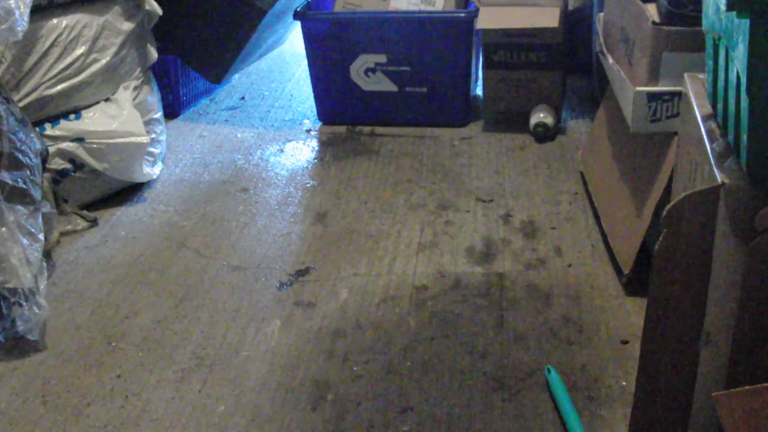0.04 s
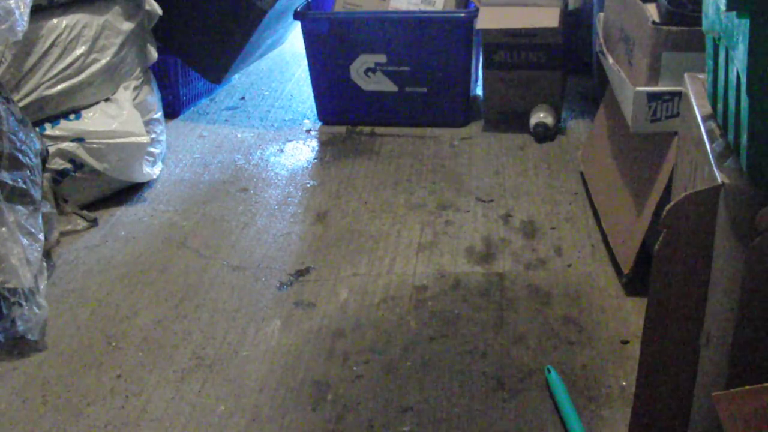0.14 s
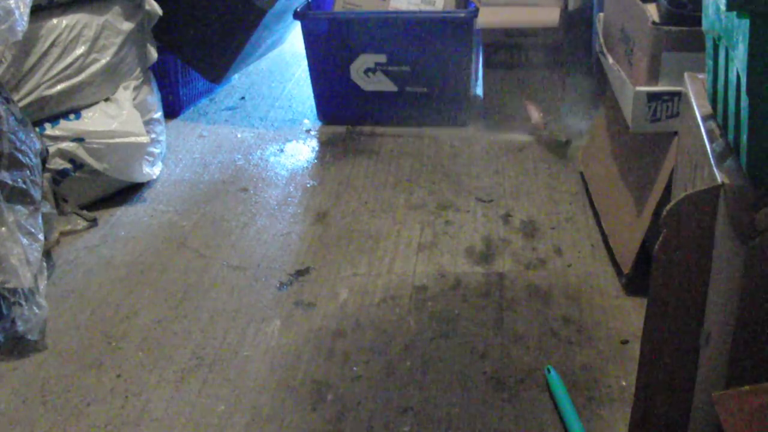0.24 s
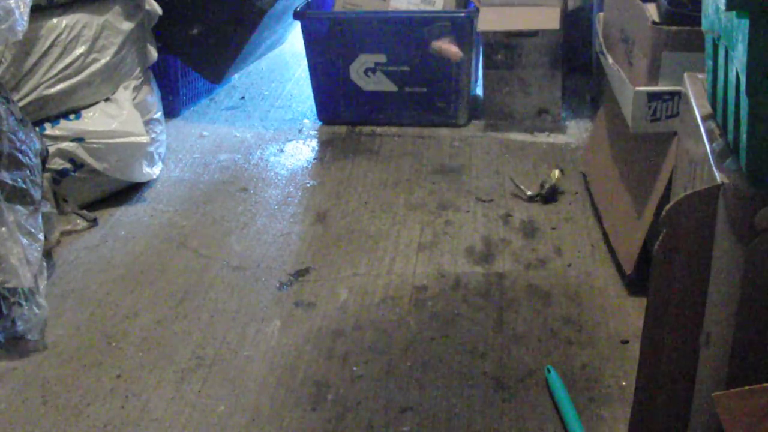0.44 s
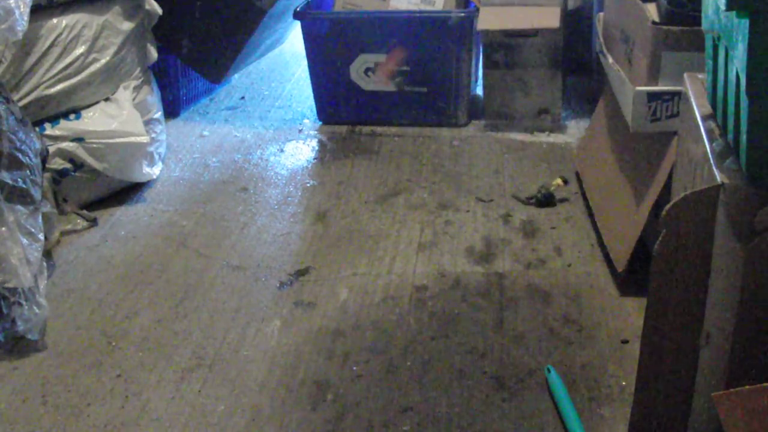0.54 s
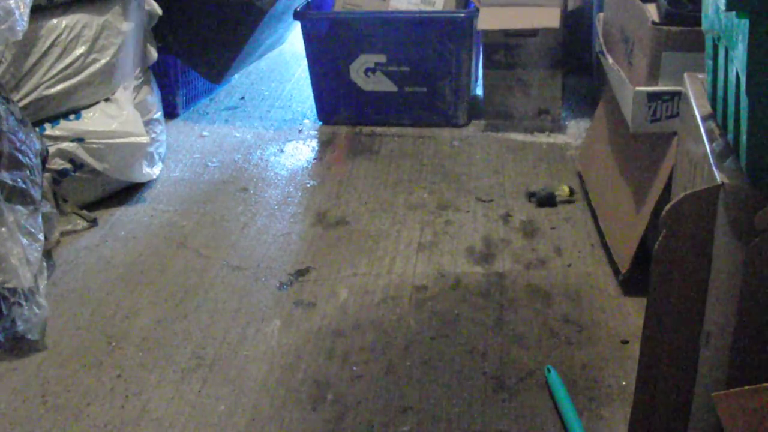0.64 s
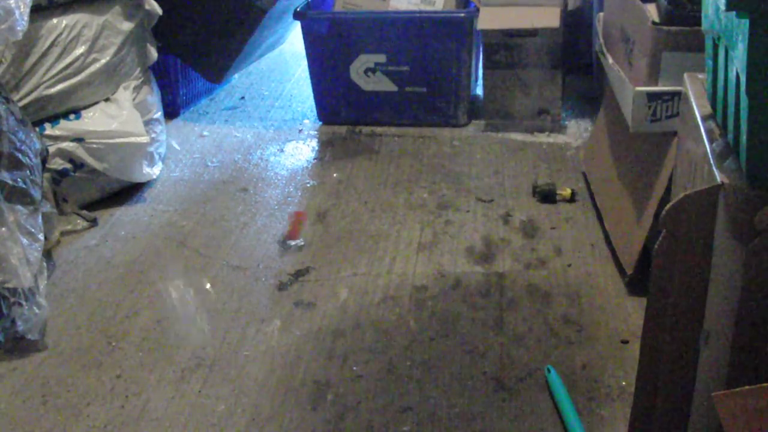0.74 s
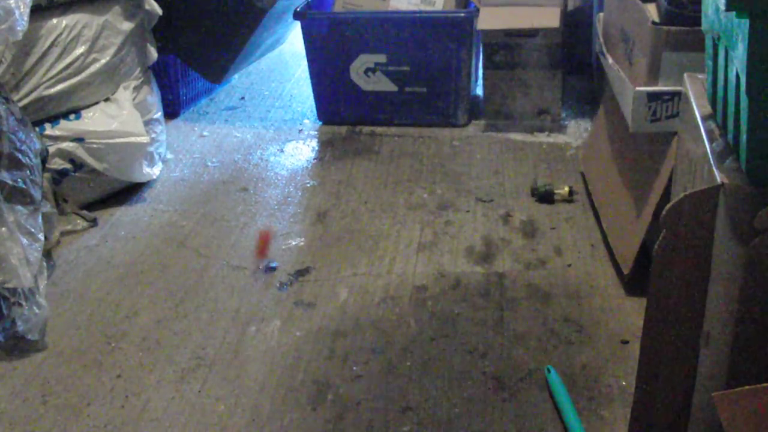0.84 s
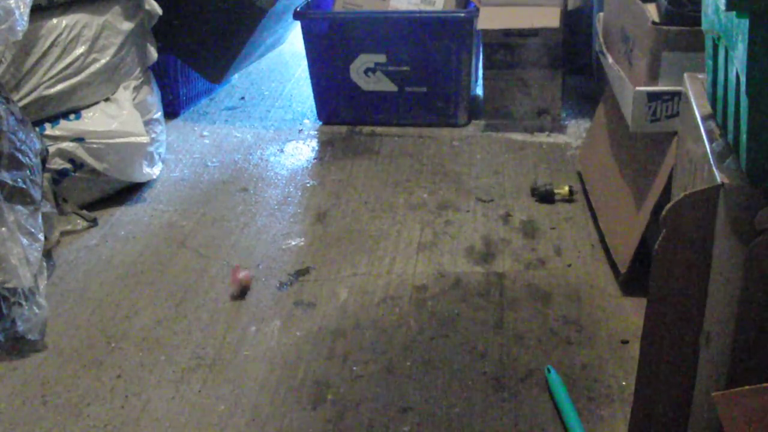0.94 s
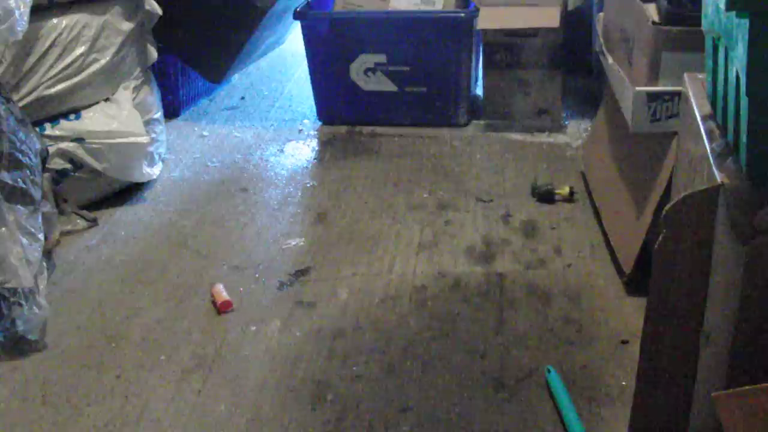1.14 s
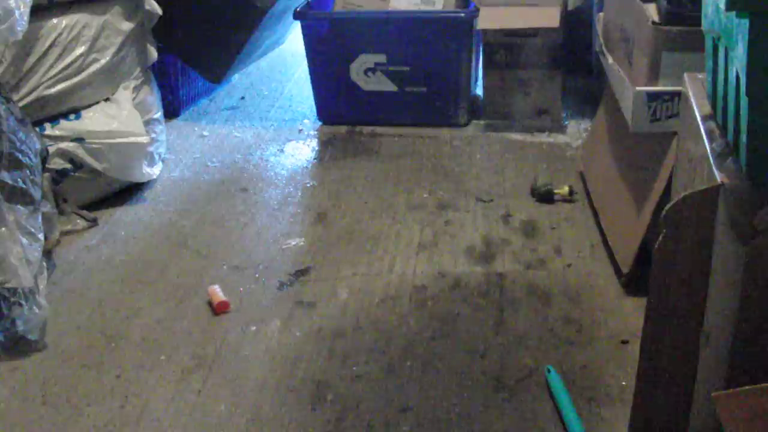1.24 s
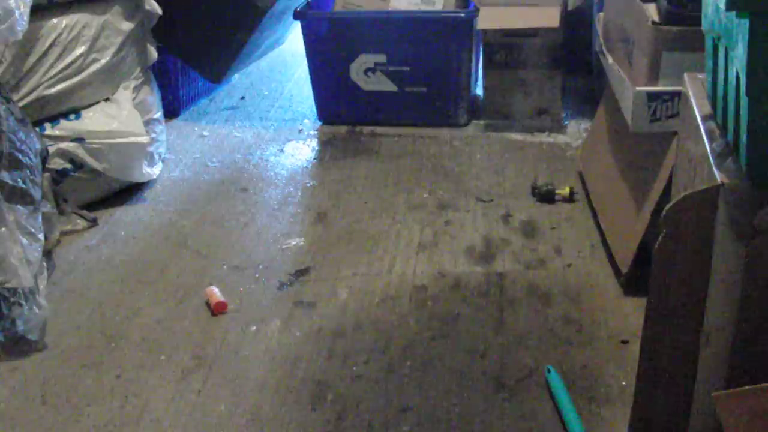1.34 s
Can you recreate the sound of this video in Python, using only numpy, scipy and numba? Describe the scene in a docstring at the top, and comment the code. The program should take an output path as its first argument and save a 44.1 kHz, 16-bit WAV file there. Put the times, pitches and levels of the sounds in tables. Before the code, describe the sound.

A toy grenade bangs loudly, then small pieces click and bounce on a concrete floor.

```python
"""Toy grenade in a storage room.

It bursts on the concrete floor, close enough to overload the microphone for a tenth of a second.
The room rings out and something metal hums on. Grit patters down, hard bits tick and whine as they
spin, the heavy body settles with dull bumps and a hollow plastic piece bounces."""
import sys
import numpy as np
from scipy import signal
from scipy.fft import rfft, irfft, next_fast_len
from scipy.io import wavfile
from numba import njit

SR = 44100
rng = np.random.default_rng(int(sys.argv[2]) if len(sys.argv) > 2 else 0)


def output_pcm(signal):
    """Save a mono or channel-first signal as 16-bit PCM at the path in sys.argv[1].

    Samples are clipped to [-1, 1] before scaling.
    """
    pcm = np.clip(np.atleast_2d(signal).T, -1, 1) * 32767
    wavfile.write(sys.argv[1], SR, np.round(pcm).astype(np.int16))


N = 61739
BURST_S = 0.2218


def undb(db):
    """Decibels to gain."""
    return 10 ** (np.asarray(db) / 20)


def unit(x):
    """Scale to rms 1."""
    return x / np.sqrt(np.mean(x ** 2))


def clock():
    """Time of every sample, in seconds."""
    return np.arange(N) / SR


def along(points, hz):
    """Read a (frequency, value) table on a log-frequency axis."""
    f, v = np.array(points, float).T
    return np.interp(np.log(hz + 1e-9), np.log(f), v)


def shape(x, gain):
    """Filter by a gain given as a function of frequency."""
    size = next_fast_len(N + N // 8)
    hz = np.maximum(np.arange(size // 2 + 1) * SR / size, 1)
    return irfft(rfft(x, size) * gain(hz), size)[:N]


def noise(spectrum):
    """Noise of rms 1, coloured by a table of relative levels."""
    return unit(shape(rng.standard_normal(N), lambda f: undb(along(spectrum, f))))


def drift(rate_hz):
    """Smooth random drift of rms 1."""
    return unit(shape(rng.standard_normal(N), lambda f: np.exp(-(f / rate_hz) ** 2)))


def fade(t60):
    """Exponential decay, 60 dB down after t60 seconds."""
    return np.exp(-np.log(1000) * clock() / t60)


def at(x, start):
    """Delay a sound to its start time."""
    return np.concatenate([np.zeros(int(start * SR)), x])[:N]


def ring(modes):
    """Decaying modes after one blow."""
    return sum(undb(db) * fade(t60) * np.sin(2 * np.pi * hz * clock()) for hz, db, t60 in modes)


def high_pass(x, hz, order=2):
    """Roll off what lies below hz."""
    return signal.sosfilt(signal.butter(order, hz, "high", fs=SR, output="sos"), x)


def tilted(x, db_per_octave, pivot_hz):
    """Brighten or dull a sound over two octaves either side of a pivot."""
    return shape(x, lambda f: undb(db_per_octave * np.clip(np.log2(f / pivot_hz), -2, 2)))


def room_tone(rumble_hz=44.7, width_hz=11):
    """The storage room at rest: faint hiss over a low rumble."""
    # spectrum of the hiss (frequency [Hz], relative level [dB])
    hiss_spectrum = [(59, -27), (100, 1.5), (147, -3), (197, 2), (283, -6.5), (801, -10), (1420, -12.5),
                     (1800, -3.5), (2270, -17), (5770, -20), (6560, -15.5), (7610, -16), (8460, -5),
                     (10200, -19), (16000, -18.5)]
    rumble = unit(shape(rng.standard_normal(N), lambda f: 1 / (1 + ((f - rumble_hz) / width_hz) ** 2)))
    return undb(-57) * noise(hiss_spectrum) + undb(-52) * rumble


def grit(grains_per_s=840, spread_db=2.5, fade_db_per_s=5):
    """Fine debris patters and rolls after the burst; the room blurs it into a slowly fading hiss."""
    # grit on concrete (frequency [Hz], relative level [dB])
    grit_spectrum = [(200, -1.5), (500, 7.5), (900, 2), (1400, -4), (2500, 0), (4000, -3.5), (6000, -1),
                     (8000, -14), (10000, -5.5), (13000, -7), (16000, -11)]
    landings = rng.random(N) < grains_per_s / SR
    grains = landings * undb(spread_db * np.minimum(rng.exponential(size=N), 2))
    blurred_power = signal.fftconvolve(grains ** 2, fade(t60=0.017))[:N]
    patter = unit(np.sqrt(np.abs(blurred_power)) * noise(grit_spectrum))
    return at(high_pass(patter, hz=140) * undb(-48.5 - fade_db_per_s * clock()), BURST_S)


def spinning_bits(edge_s=0.0093, pitch_jitter=0.0088, flutter_db=2):
    """Spinning bits whine and sink in pitch as they slow; reflections make them waver."""
    # one curve for each bit's whine (time [s], pitch [Hz], level [dB])
    whines = [
        [(.92, 2590, -58), (.966, 2703, -52), (1.01, 2657, -49.5), (1.03, 2680, -52), (1.06, 2665, -51),
         (1.095, 2625, -47), (1.118, 2600, -63), (1.13, 2555, -49.5), (1.2, 2440, -50.5)],
        [(1.335, 1796, -46.5), (1.35, 1668, -56), (1.4, 1560, -54)],
    ]
    t, direct = clock(), np.zeros(N)
    for curve in whines:
        times, hz, db = np.array(curve).T
        pitch = np.interp(t, times, hz) * (1 + pitch_jitter * drift(rate_hz=144))
        phase = 2 * np.pi * np.cumsum(pitch) / SR
        tone = undb(-0.5) * np.sin(phase) + undb(-7.5) * np.sin(2 * phase)
        gate = np.clip(1 + np.minimum(t - times[0], times[-1] - t) / edge_s, 0, 1)
        gain = undb(np.interp(t, times, db) + flutter_db * drift(rate_hz=60))
        direct += np.sqrt(2) * gate * gain * tone
    room = rng.standard_normal(N) * fade(t60=0.15)
    return direct + undb(-8) * signal.fftconvolve(direct, room / np.linalg.norm(room))[:N]


def heavy_body():
    """The grenade body rocks on the floor and settles with dull, quiet bumps."""
    # bumps (time [s], level [dB])
    bumps = [(.705, -44), (.735, -46), (.779, -46)]
    # spectrum of a bump (frequency [Hz], relative level [dB])
    bump_spectrum = [(100, -20), (250, -8), (330, -1), (550, -2.5), (900, -6), (2000, -13.5), (4000, -25)]
    return sum(undb(db) * at(noise(bump_spectrum) * fade(t60=0.38), start) for start, db in bumps)


def hollow_piece(slap_s=0.0013, room_db=-9.5, shell_db=-14.5):
    """The hollow plastic piece slaps the floor and rings briefly in the room."""
    # bounces (time [s], level [dB], low cut [Hz], high cut [Hz])
    bounces = [(1.1975, -25.5, 354, 9000), (1.2036, -38, 1990, 5800), (1.209, -27, 408, 6160),
               (1.222, -41, 403, 4030), (1.2925, -31.5, 1650, 5140), (1.3335, -30, 1500, 3760),
               (1.348, -41.5, 1470, 3070)]
    # plastic slapping concrete (frequency [Hz], relative level [dB])
    slap_spectrum = [(200, -5), (600, -5), (800, 0.5), (1900, -2), (2700, -5), (6400, -16), (11000, -13),
                     (16000, -27)]
    # modes of the shell (frequency [Hz], relative level [dB], t60 [s])
    shell_modes = [(215, -2, 0.13), (440, -4, 0.16), (748, 1, 0.24), (837.5, 5.5, 0.27), (1152, 4.5, 0.093),
                   (1425, -4, 0.1), (1663, 6, 0.049), (1876, 1.5, .1), (2470, 1.5, 0.097),
                   (2440, -2.5, 0.15)]
    out = np.zeros(N)
    envelope = np.exp(-clock() / slap_s) + undb(room_db) * fade(t60=0.33)
    for start, db, low_hz, high_hz in bounces:
        blow = envelope * noise(slap_spectrum) + undb(shell_db) * ring(shell_modes)
        band = signal.butter(2, [low_hz, high_hz], "band", fs=SR, output="sos")
        out += undb(db) * at(signal.sosfilt(band, blow), start)
    return out


def hard_bits(click_s=0.00055, boxes_db=-15, room_db=-19, resonance_octaves=0.19):
    """Each hard bit clicks on the concrete; nearby boxes and then the room answer."""
    # strikes (time [s], level [dB], tilt [dB/octave], low cut [Hz], resonance [Hz], its lift [dB])
    strikes = [(0.599, -27.5, 1.5, 1980, 5940, -5), (0.657, -41, 7.5, 2960, 7000, 7),
               (.7025, -17, 5.5, 1860, 4240, 2.5), (0.7052, -19.5, -0.5, 1880, 4300, 2.5),
               (0.7087, -22.5, 6.5, 1910, 2260, 16), (0.7176, -32, -8, 1980, 3980, 9),
               (.7363, -31, 7.5, 4000, 10800, 6), (.7505, -33, 6.5, 4000, 10000, 5),
               (0.7788, -25.5, -4.5, 1386, 2470, 6), (.782, -25.5, -3.5, 1400, 2400, -4),
               (0.8931, -22, -1.5, 1850, 2090, 6), (0.8941, -27, 5.5, 2200, 4000, 4),
               (0.92, -30.5, 3, 3570, 6970, 5), (0.924, -36.5, 12, 3450, 7000, 3),
               (0.9293, -44, -5, 3500, 11000, 0), (0.93, -25.5, 7, 3500, 7150, -1),
               (.9399, -35, 4, 3500, 13000, 13), (0.9726, -25, 3, 2030, 9900, 4),
               (0.987, -43.5, 4, 1810, 2160, 28), (1, -38, 6, 2030, 10100, -9),
               (1.0323, -34.5, 6, 3000, 9100, 1), (1.0597, -29, 0.5, 1950, 5370, 7.5),
               (1.07, -38, 7, 2500, 5530, 10), (1.0826, -32, 6, 3000, 5800, -6),
               (1.087, -32, 0.5, 2000, 5770, 8)]
    # the click and the room's answer (frequency [Hz], relative level [dB])
    click_spectrum = [(1000, 5.5), (5000, 0), (10000, -5), (16000, -13)]
    room_spectrum = [(1000, 4), (4000, 4), (10000, -6), (16000, -24)]
    out = np.zeros(N)
    envelope = np.exp(-clock() / click_s) + undb(boxes_db) * fade(t60=0.081)
    for start, db, tilt, low_hz, resonance_hz, lift_db in strikes:
        near = envelope * noise(click_spectrum)
        room = undb(room_db) * fade(t60=0.39) * noise(room_spectrum)
        hit = shape(near + room,
                    lambda f: undb(lift_db * np.exp(-(np.log2(f / resonance_hz) / resonance_octaves) ** 2)))
        hit = tilted(hit, tilt, pivot_hz=4450)
        out += undb(db) * at(high_pass(hit, low_hz, order=3), start)
    return out


def room_tail(spectrum):
    """The room's reverberation: each octave dies at its own rate, the highest first."""
    # decay of the storage room (frequency [Hz], t60 [s])
    decay_times = [(60, .6), (250, 0.42), (800, 0.47), (2000, 0.53), (5000, 0.53), (14000, 0.36)]
    wash, tail = noise(spectrum), 0
    centres_hz = np.geomspace(60, 15360, 9)
    for hz, share in zip(centres_hz, np.eye(len(centres_hz))):
        band = shape(wash, lambda f: np.interp(np.log(f), np.log(centres_hz), share))
        tail = tail + band * fade(along(decay_times, hz))
    return tail


def burst(crack_s=0.0022, build_s=0.0021, early_hold_s=0.078, early_t60_s=0.19):
    """A crack, a thump and hiss of gas, a dense wash of early reflections, then the room tail."""
    # the opening crack (frequency [Hz], relative level [dB])
    crack_spectrum = [(100, -1), (500, -19), (1000, 2.5), (1500, 1), (2500, -31), (4000, -4), (6000, -20),
                      (16000, -24.5)]
    # the burst as the room returns it (frequency [Hz], relative level [dB])
    blast_spectrum = [(30, -25), (60, -37), (110, -18), (200, -19), (320, -3.5), (480, 0), (850, 3.5),
                      (1300, -2), (2200, -5), (5000, -18.5), (9000, -26.5), (16000, -41)]
    # escaping gas and flying grit (frequency [Hz], relative level [dB])
    spray_spectrum = [(800, -23), (1600, 1.5), (2500, -14), (4000, 0.5), (8000, -10.5), (16000, -25)]
    # slow reverberation from farther off in the building (frequency [Hz], relative level [dB])
    boom_spectrum = [(50, -11), (100, 6.5), (180, -15), (270, 2.5), (450, -8.5), (700, 2), (1100, -0.5),
                     (2000, -4.5), (4000, -43)]
    # metal set ringing by the burst (frequency [Hz], level [dB], t60 [s])
    metal_modes = [(241.5, -45.5, 2.58), (555, -43, 1.8), (729, -33, .8), (793, -38, 2.89)]
    thump_hz, thump_delay_s, thump_width_s = 56.4, 0.023, 0.027
    t = clock()
    crack = undb(16.5) * np.exp(-t / crack_s) * noise(crack_spectrum)
    swell = np.exp(-((t - thump_delay_s) / thump_width_s) ** 2)
    thump = undb(-14) * swell * np.sin(2 * np.pi * thump_hz * t)
    early_decay = np.exp(-np.log(1000) * np.maximum(t - early_hold_s, 0) / early_t60_s)
    early = undb(3) * noise(blast_spectrum) * early_decay
    tail = undb(-2.5) * room_tail(blast_spectrum)
    spray = undb(-1.5) * noise(spray_spectrum) * fade(t60=0.28)
    boom = undb(-34) * noise(boom_spectrum) * fade(t60=1.72)
    room = (1 - np.exp(-t / build_s)) * (early + spray + tail + boom)
    return at(crack + thump + room + ring(metal_modes), BURST_S)


def scene():
    """The burst and all that falls after it, as they reach one microphone in the room."""
    mix = burst() + hard_bits() + hollow_piece() + heavy_body() + spinning_bits() + grit() + room_tone()
    return mix[None]


@njit
def follow(x, attack_s, release_s):
    """The limiter's level follower, with separate rise and fall times."""
    out, level = np.empty(len(x)), 0.
    for i in range(len(x)):
        lag_s = attack_s if abs(x[i]) > level else release_s
        level += (abs(x[i]) - level) / (lag_s * SR)
        out[i] = level
    return out


def record(dry, ceiling=0.65, knee=4, limit=0.36, notch_hz=7920, top_hz=15800):
    """The microphone clips, a limiter ducks the level, and the recorder notches and trims the band."""
    oversampled = signal.resample_poly(dry[0], 2, 1)
    clipped = oversampled / (1 + np.abs(oversampled / ceiling) ** knee) ** (1 / knee)
    x = signal.resample_poly(clipped, 1, 2)
    level = follow(x, attack_s=0.0015, release_s=0.095)
    x = x * np.minimum(1, limit / (level + 1e-9))
    x = high_pass(x, hz=39, order=1)
    x = signal.lfilter(*signal.iirnotch(notch_hz, Q=18, fs=SR), x)
    treble_cut = signal.ellip(8, 0.2, 70, top_hz, fs=SR, output="sos")
    return signal.sosfilt(treble_cut, x)[None]


dry = scene()
out = record(dry)
output_pcm(out)
```